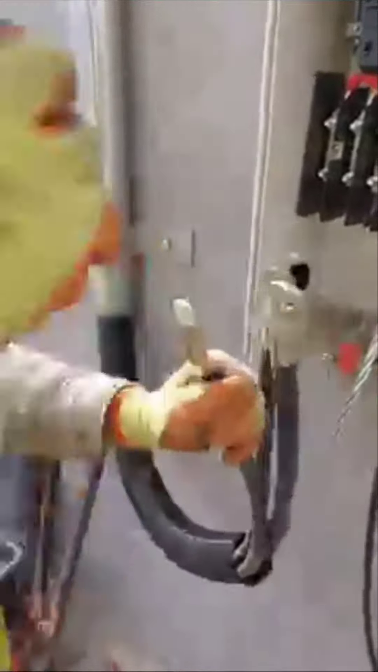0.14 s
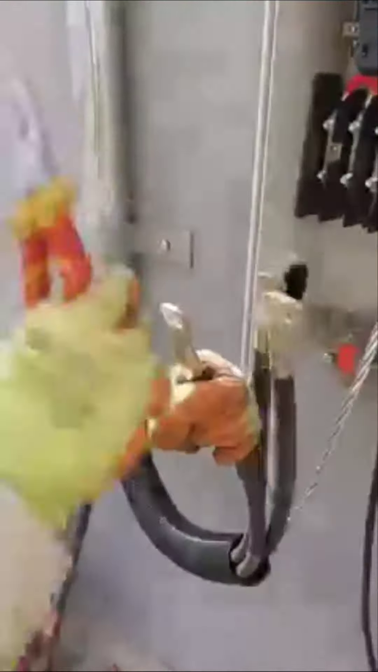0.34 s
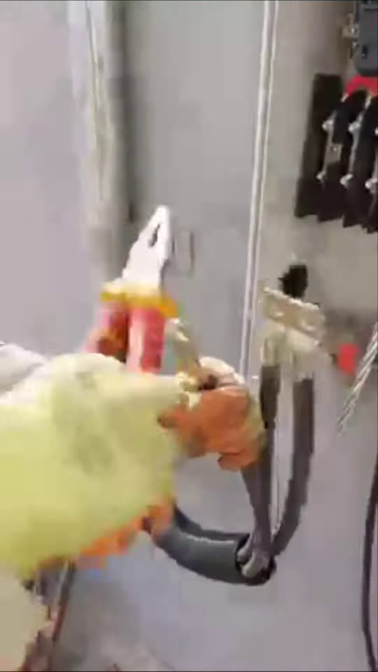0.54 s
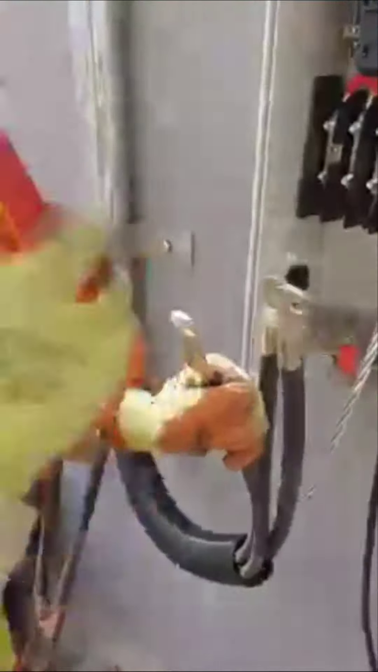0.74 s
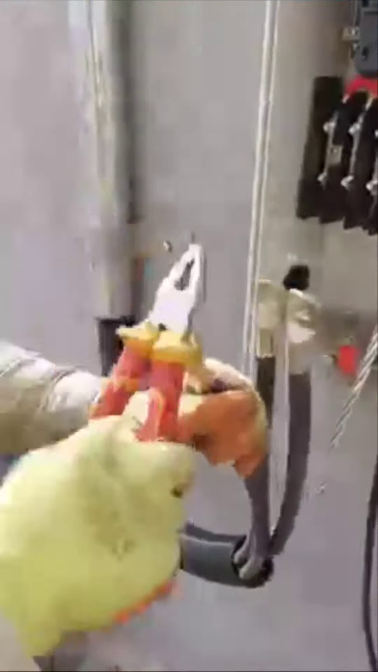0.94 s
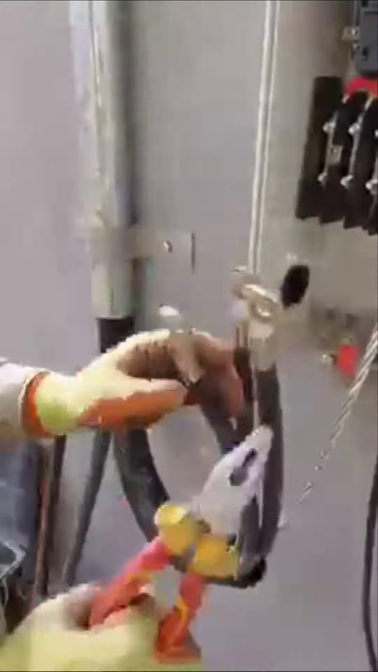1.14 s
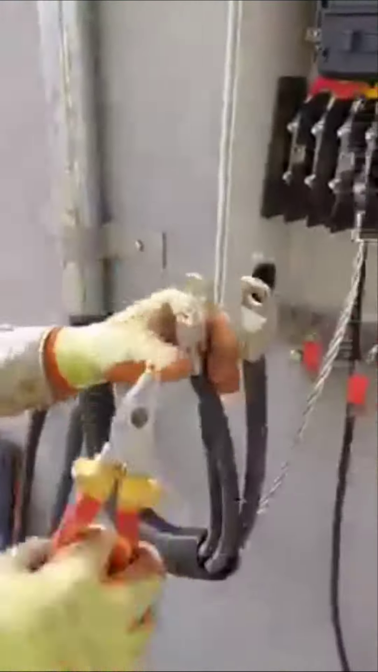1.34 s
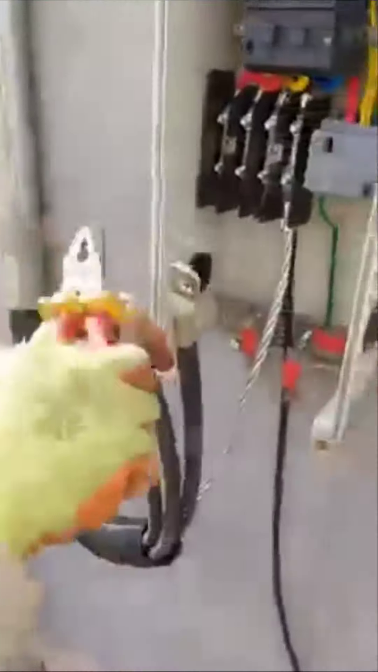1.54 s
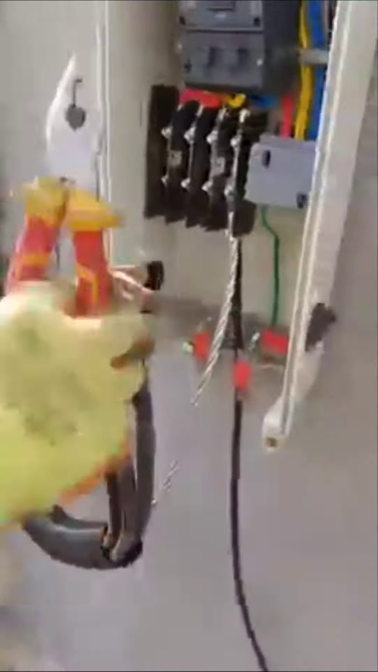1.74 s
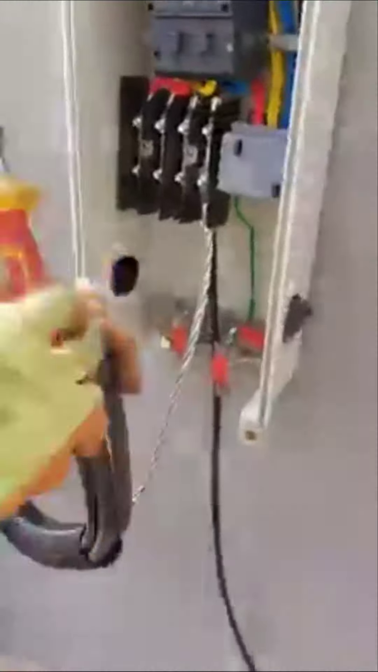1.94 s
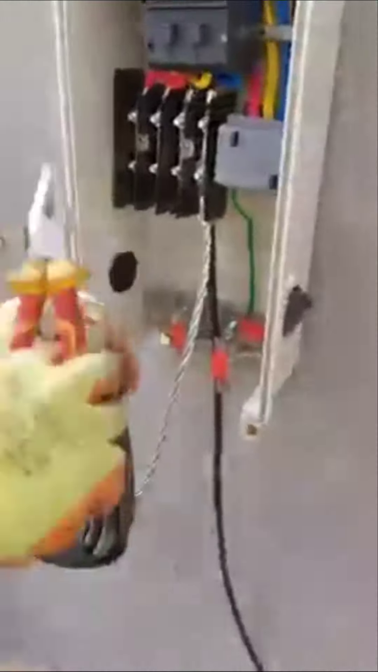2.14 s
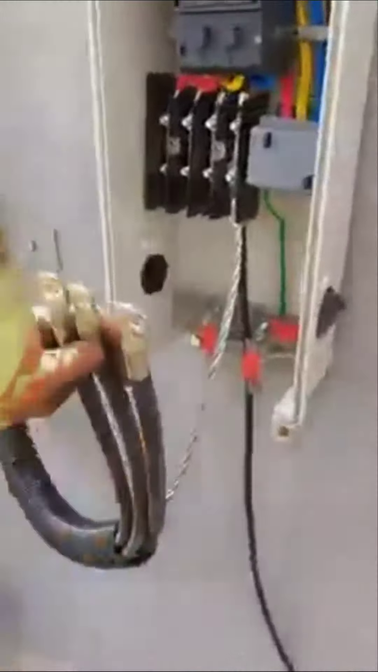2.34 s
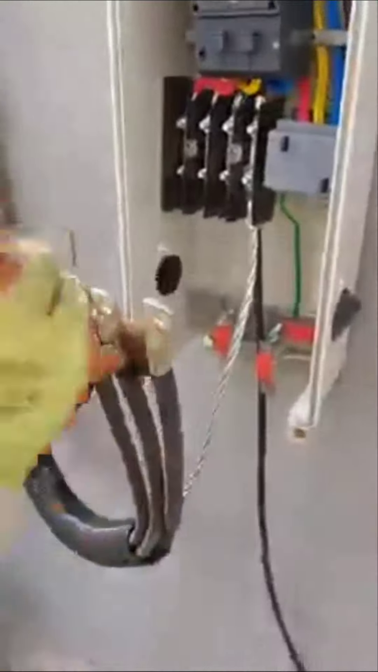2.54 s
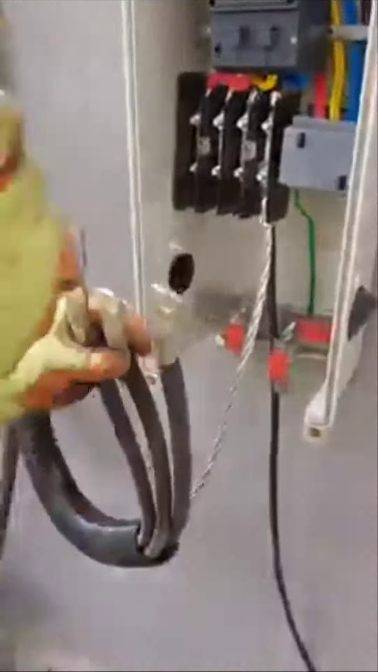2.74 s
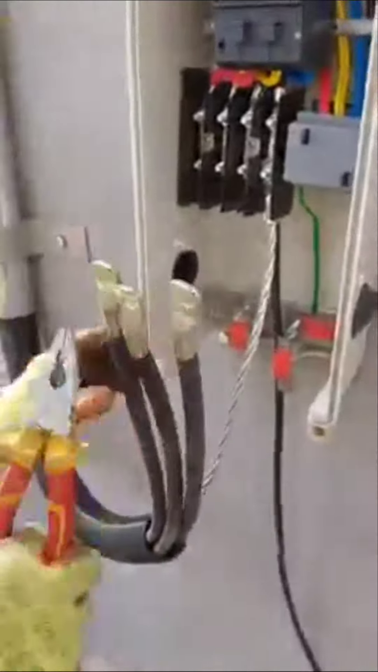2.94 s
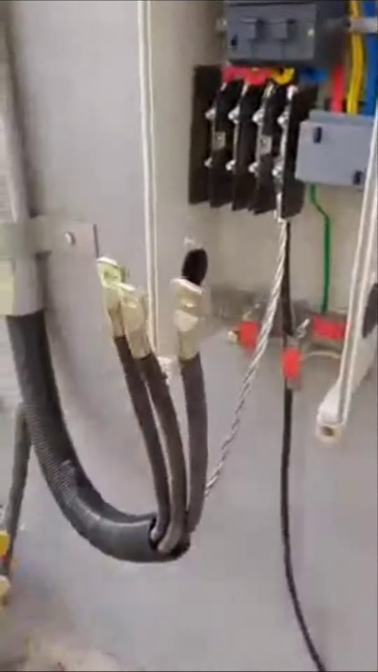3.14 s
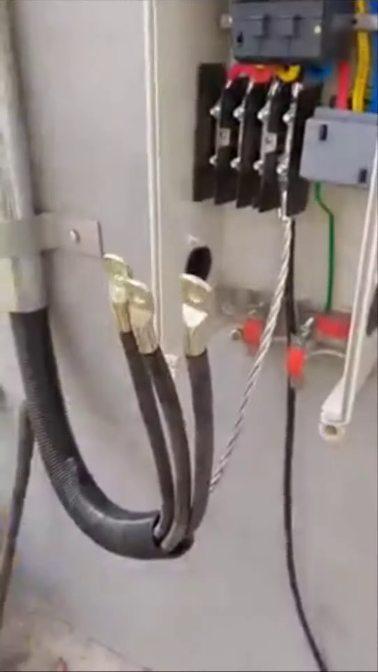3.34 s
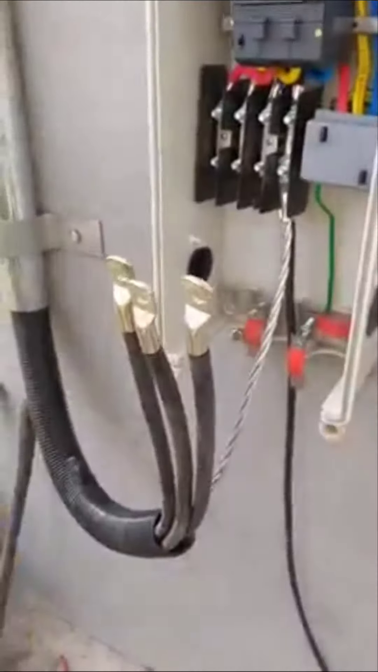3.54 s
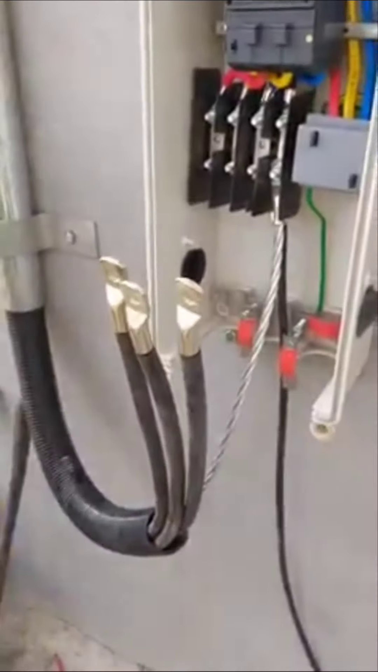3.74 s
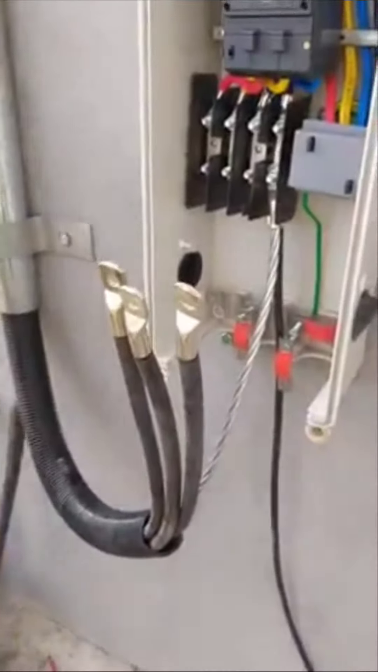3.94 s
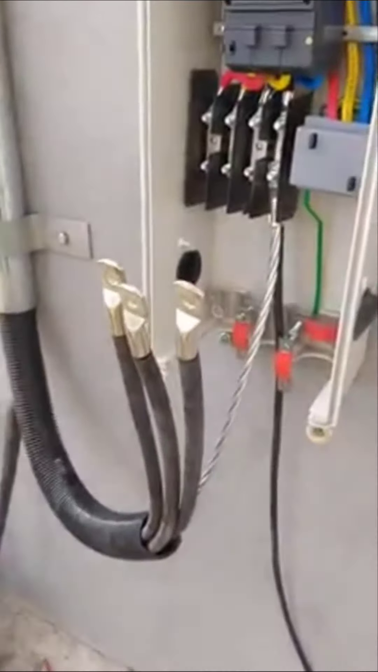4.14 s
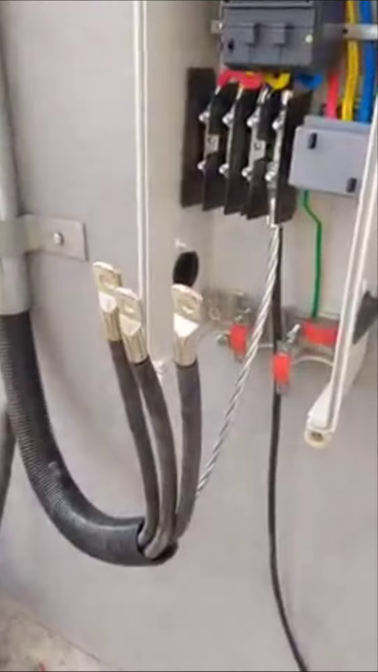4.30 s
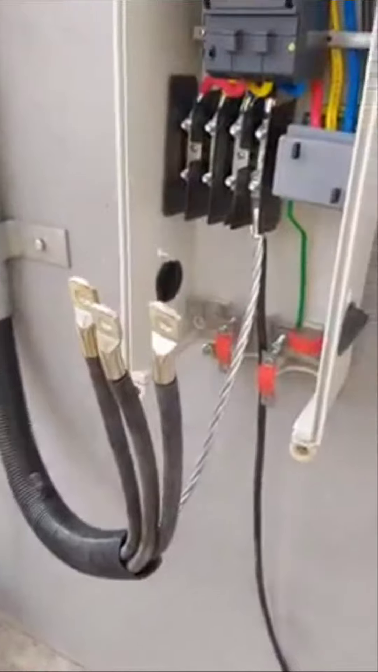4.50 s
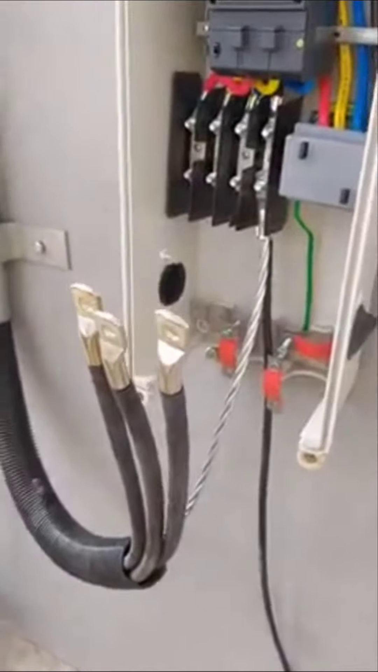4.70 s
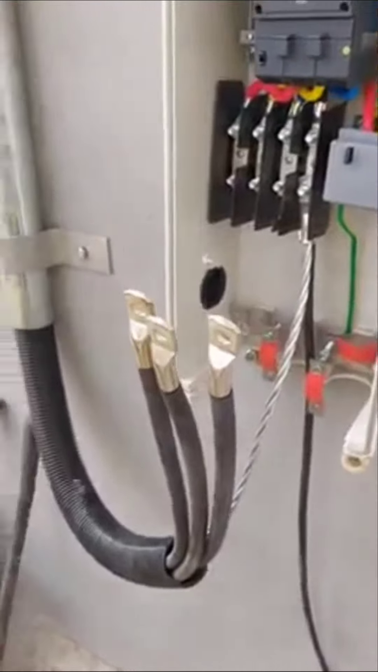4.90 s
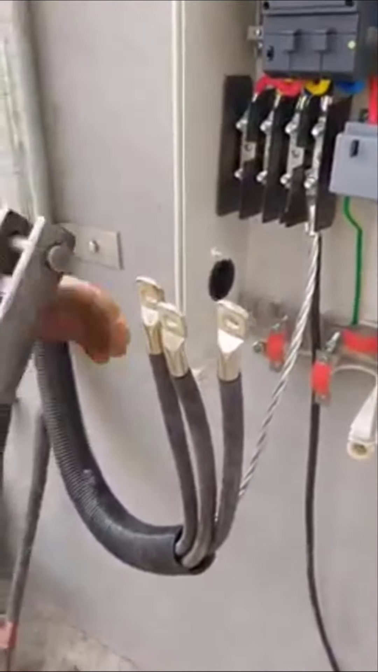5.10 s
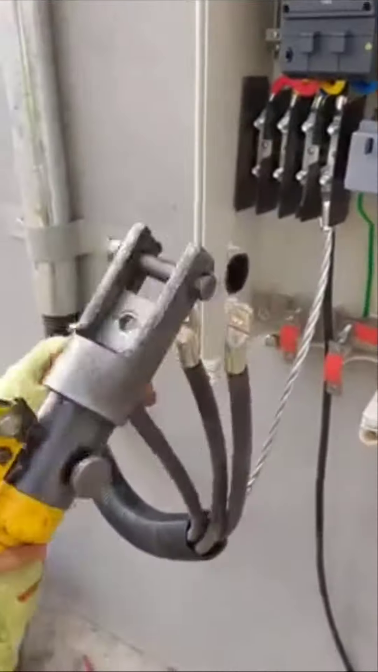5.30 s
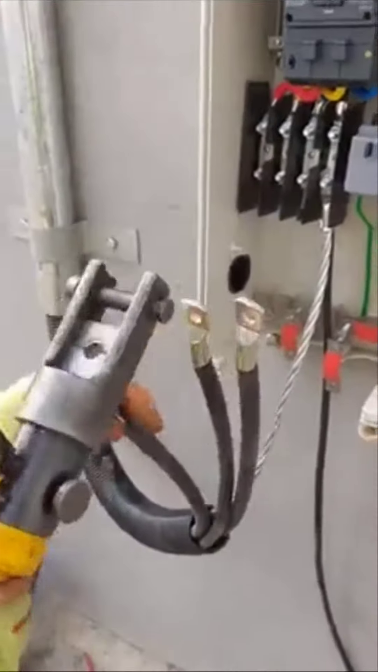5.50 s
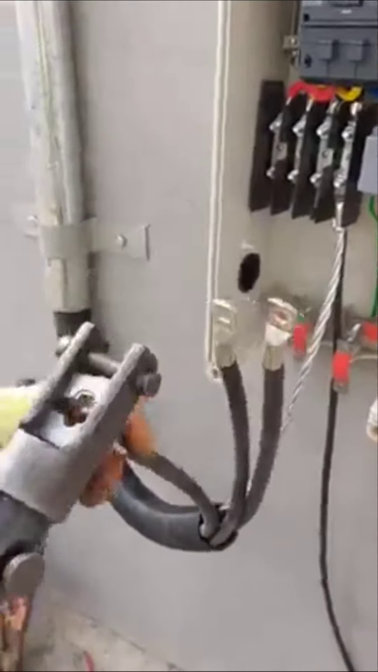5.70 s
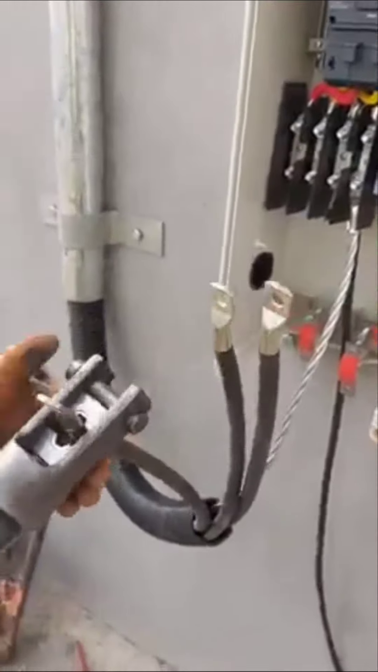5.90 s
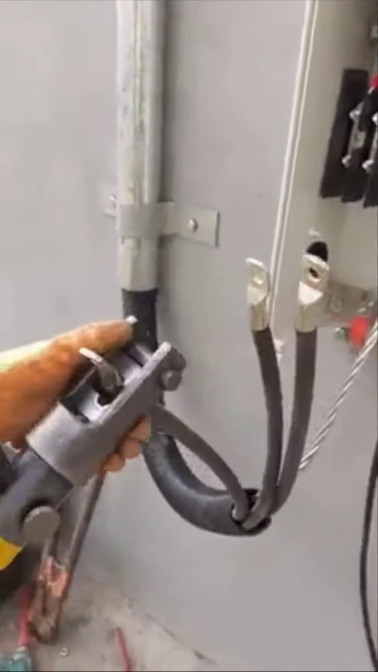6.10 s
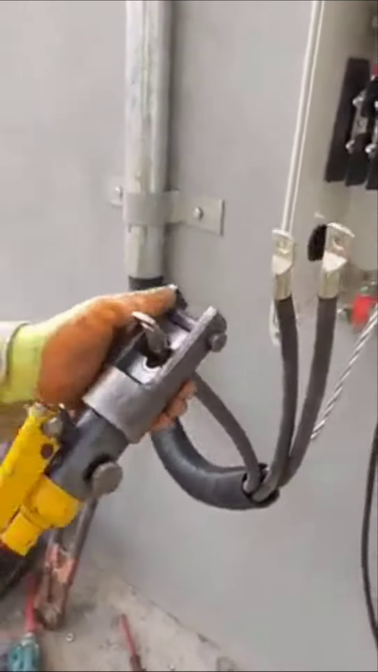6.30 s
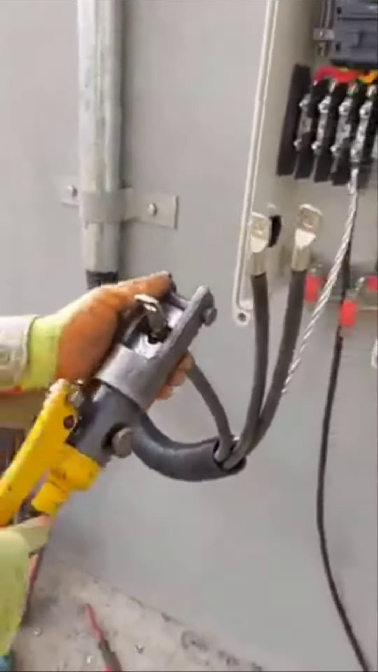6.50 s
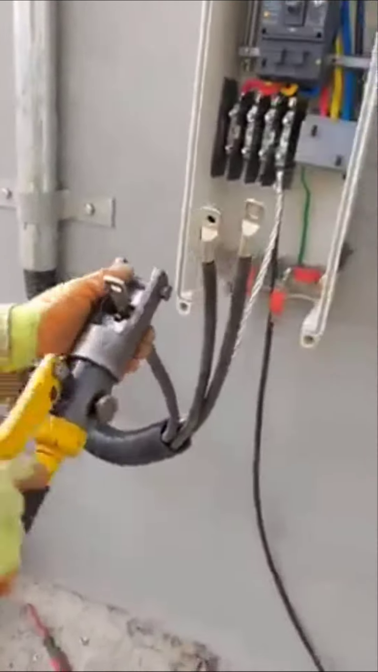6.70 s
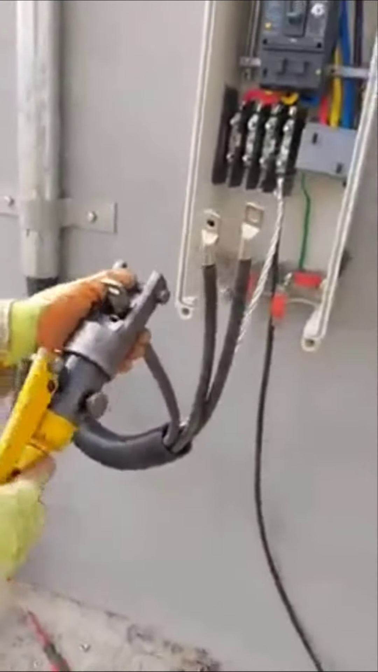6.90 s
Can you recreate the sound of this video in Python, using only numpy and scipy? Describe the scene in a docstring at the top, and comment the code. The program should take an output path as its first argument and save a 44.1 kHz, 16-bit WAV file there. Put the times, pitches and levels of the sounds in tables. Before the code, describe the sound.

Rapid metal clacks come about seven a second, pause briefly, then resume less regularly, ringing a thin steel panel. A quieter gap holds only low hum and faint rustle before a dull, hollow double clunk. Later come cable bumps, glove scuffs, lug clashes and short, damped steel clinks ending in a loud snap. Close microphone, stereo, with a short echo from a hard bare room.

```python
"""Steel pliers tap in quick runs on cable lugs in a sheet-steel cabinet: noise cracks, metal rings, thumps.
A heavy tool clunks down below, made of hollow tones that sag in pitch plus noisy clatter.
Gloves, sleeves and a stiff cable rustle and scrape as shaped noise; lugs knock together.
The head of a hand hydraulic crimper clinks and snaps onto a lug, as short rings with knocks and ticks.
All is close by in a bare electrical room, over its low drone of filtered noise."""
import sys
import numpy as np
from scipy import signal
from scipy.fft import rfft, irfft, next_fast_len
from scipy.io import wavfile

SR = 44100
rng = np.random.default_rng(int(sys.argv[2]) if len(sys.argv) > 2 else 0)


def materialize(psi):
    """Save the field psi as 16-bit PCM at rate SR to the path in sys.argv[1].

    A 1-D psi becomes a single channel; in a 2-D psi each row is a channel.
    """
    bounded = np.clip(np.atleast_2d(psi).T, -1, 1)
    quanta = np.round(bounded * 32767).astype(np.int16)
    wavfile.write(sys.argv[1], SR, quanta)


N = 306495
T = np.arange(N) / SR  # time in seconds
HIT_T = T[:SR // 2]  # time within one short sound
LEAD_S = .006  # the sound swells for this long before its peak


def undb(db):
    """Turn decibels into gain."""
    return 10 ** (np.asarray(db) / 20)


def add(track, s, sound, pan_db=0):
    """Mix a sound into a stereo track at time s; pan_db is left minus right."""
    i = max(int(s * SR), 0)
    sides = undb([[pan_db / 2], [-pan_db / 2]])
    track[:, i:i + sound.shape[-1]] += (sound * sides)[:, :N - i]


def noise(like, size=N, grain_db=0):
    """Stereo noise of rms 1; like = share common to both sides, grain_db makes it gritty."""
    like = np.clip(like, 0, 1)
    shared = np.sqrt(like) * rng.standard_normal(size)
    x = shared + np.sqrt(1 - like) * rng.standard_normal((2, size))
    grain = np.repeat(rng.standard_normal(size // 16 + 1), 16)[:size]  # a new level every 16 samples
    x = x * undb(grain_db * grain)
    return x / x.std()


def through(x, response):
    """Pass x through a response scaled to unit energy."""
    response = np.atleast_2d(response)
    energy = (response ** 2).sum(1).mean()
    return signal.fftconvolve(x, response / np.sqrt(energy), axes=1)[:, :x.shape[1]]


def colour(x, points, size=4096):
    """Filter to a (Hz, dB) shape without sounding early; white noise keeps its level."""
    hz, db = np.transpose(points)
    bins_hz = np.arange(size // 2 + 1) * SR / size
    shape = np.interp(np.log(bins_hz + 1), np.log(hz), db)
    # folding the cepstrum puts the response's energy as early as possible
    cepstrum = irfft(np.log(undb(shape)))
    cepstrum[1:size // 2] *= 2
    cepstrum[size // 2 + 1:] = 0
    return through(x, irfft(np.exp(rfft(cepstrum))))


def fade(t60):
    """Exponential decay that falls by 60 dB in t60 seconds."""
    return np.exp(-np.log(1000) * HIT_T / max(t60, 1e-3))


def ring(x, modes, t60, detune=0., scatter_db=0):
    """Decaying (Hz, dB) tones excited by x; high ones reach the two sides out of step."""
    t = HIT_T[:int(t60 * SR)]
    decay = fade(t60)[:len(t)]
    response = 0
    for (hz, db), (shift, size, *skew) in zip(modes, rng.standard_normal((len(modes), 4))):
        side_phase = np.array(skew)[:, None] * min(hz / 1500, 2)
        phase = 2 * np.pi * hz * (1 + detune * shift) * t + side_phase
        response = response + undb(db + scatter_db * size) * decay * np.sin(phase)
    return through(x, response)


def contact(t60, like, crack=0., grain_db=3, swell_s=0.0014):
    """Noise swells briefly to a crack, then chatters and dies away."""
    t = HIT_T[:SR // 4] - LEAD_S
    envelope = np.exp(np.minimum(t / swell_s, -np.log(1000) * t / max(t60, 1e-3)))
    x = noise(like, len(t), grain_db) * envelope
    x[:, int(LEAD_S * SR)] += crack
    return x


def bounced(x, delay_s, db):
    """A contact followed by its weaker repeat."""
    return x + undb(db) * np.roll(x, int(delay_s * SR), axis=1)


def waver(rate, depth_db):
    """A gain that wanders at random, picking a new target rate times a second."""
    targets = rng.standard_normal(4096)
    return undb(depth_db * np.interp(T * rate, np.arange(4096), targets))


def gestures(rows, attack_s, release_s):
    """Gain over time of (start s, length s, dB) movements: each swells, holds and dies away."""
    total = 0
    for s, length, db in rows:
        swell = np.clip((T - s) / attack_s, 0, 1)
        dying = np.exp(-np.maximum(T - s - length, 0) / release_s)
        total = total + undb(db) * swell * dying
    return total


# Tone of the room's background drone. Each row: frequency in Hz, level in dB before the overall level.
AIR = [(18, -88), (30, -37.5), (86, -7), (103, 2.5), (124, 5), (266, -18.5), (760, -27.5), (844, -27),
       (1350, -31.5), (1720, -34.5), (3060, -38), (3670, -37.5), (6050, -40.5), (13000, -41.5),
       (16000, -52)]
AIR_DB = -52.5


def room_drone():
    """The room's background drone: filtered noise, strongest in the lows, that wavers slowly."""
    return colour(noise(0.73), AIR) * waver(2.5, 1.0) * undb(AIR_DB)


# Tone of the echo tail. Each row: frequency in Hz, relative level in dB.
ROOM_COLOUR = [(50, -14.5), (150, -0.5), (400, 7.5), (900, 3), (2000, -1), (5000, -4), (9000, -5.5),
               (15000, -44)]


def room(x, wet_db, t60=0.28):
    """Add the room's echoes: a diffuse noise tail that builds up, then fades."""
    tail = through(x, noise(0.94, len(HIT_T)) * fade(t60) * (1 - fade(0.023)))
    return x + undb(wet_db) * colour(tail, ROOM_COLOUR)


# Cuffs brushing past. Each row: start in seconds, length in seconds, level in dB.
CUFFS = [(4.39, 0.2, -53.5), (5.26, 0.047, -41), (5.8, 0.041, -44)]
# Airy tone of the cloth. Each row: frequency in Hz, relative level in dB.
CUFF_COLOUR = [(3000, -22), (7000, -1), (9500, 5), (13000, -5), (16000, -19)]


def cuffs():
    """Cloth brushes past: a thin, fluttering hiss."""
    brushing = gestures(CUFFS, attack_s=0.015, release_s=0.0077)
    return colour(noise(.25, grain_db=2) * waver(54, 2) * brushing, CUFF_COLOUR)


def glove_swish(s=1.385, length=.1, start_hz=10000, end_hz=5200, db=-54):
    """A knitted glove slides along the cable and slows, so its thin, ragged hiss falls in pitch."""
    out = np.zeros((2, N))
    u = np.linspace(0, 1, int(length * SR))  # progress from 0 to 1
    threads = colour(noise(.3, len(u), grain_db=8), [(700, 0), (1600, -10), (4000, -26), (8000, -50)])
    glide = np.sin(2 * np.pi * np.cumsum(start_hz + (end_hz - start_hz) * u) / SR)
    flutter = waver(72, 5.1)[:len(u)]
    # the low noise rides on the gliding tone, which lifts it to a falling hiss
    add(out, s, undb(db) * threads * glide * np.sin(np.pi * u) * flutter)
    return out


def scuff(x):
    """The contact patch keeps shifting, so every third of an octave swells and sinks by itself."""
    size = next_fast_len(N)
    spectrum = rfft(x, size)
    octave = np.log2(np.arange(size // 2 + 1) * SR / size + 1)
    out = 0
    for centre in np.arange(7, 14.2, 1 / 3):
        band = np.maximum(1 - 3 * np.abs(octave - centre), 0)
        out = out + irfft(spectrum * band, size)[:, :N] * waver(40, 3.5)
    return out


GRIT_PER_S, GRIT_DB, GRIT_SPREAD_DB = 27, 21, 4.5  # catches a second, their level and its spread


def grit():
    """Sliding metal catches at random: tiny ticks of uneven size."""
    size_db = GRIT_DB + GRIT_SPREAD_DB * np.clip(rng.standard_normal(N), -2, 2)
    catches = (rng.random(N) < GRIT_PER_S / SR) * undb(size_db)
    ticks = through(np.array([catches, catches]), contact(0.021, .3))
    return colour(ticks, HEAD_COLOUR)


# Strokes of glove and cable sliding.
# Each row: start in seconds, length in seconds, level in dB, hiss in dB relative to that level.
STROKES = [(1.787, 0.033, -69, 7), (2.242, 0.056, -67, 2), (2.606, 0.025, -55.5, 5), (3.21, .02, -71, 8),
           (3.301, 0.11, -63.5, -0.5), (3.908, 0.043, -55.5, -5), (4.13, 0.1, -69.5, -0.5),
           (4.368, 0.064, -46, -5), (4.456, 0.062, -74.5, 16), (4.641, 0.029, -54, 3.5),
           (4.856, 0.21, -56.5, -2), (5.09, 0.19, -54, 0), (5.239, 0.35, -41, -1),
           (5.421, 0.13, -41.5, -25), (5.69, 0.11, -39, -1), (5.847, 0.39, -51.5, 0.5),
           (6.16, 0.041, -50, 3.5), (6.282, 0.13, -53, 2), (6.401, 0.43, -59, 7)]
STROKE_ATTACK_S, STROKE_RELEASE_S = 0.042, 0.047
# The stiff cable flexing in the hands. Each row: start in seconds, length in seconds, level in dB.
FLEXES = [(.62, 0.37, -43), (1.49, .7, -56), (2.39, .5, -53), (4.33, 0.06, -45), (4.54, 0.035, -42),
          (4.65, 0.16, -50), (5.35, 0.24, -39), (5.61, 0.029, -32.5), (5.75, 0.19, -39),
          (5.955, 0.027, -31.5), (6.02, 0.022, -27.5), (6.24, 0.077, -35), (6.33, 0.242, -31),
          (6.58, 0.087, -32), (6.735, 0.016, -31.5)]
FLEX_ATTACK_S, FLEX_RELEASE_S = 0.0056, 0.023
# Tones of the scrape, the hiss and the low bumps. Each row: frequency in Hz, relative level in dB.
SCRAPE_COLOUR = [(150, -37), (250, -5), (468, -0.5), (597, -5.5), (735, -2.5), (1130, -6.5), (1240, -7),
                 (4000, -23.5), (5200, -71.5), (8800, -120)]
HISS_COLOUR = [(1180, -18.5), (2000, -7.5), (4610, -9.5), (5030, -12), (5930, -13), (10000, -14.5),
               (14800, -30), (16000, -52)]
RUMBLE_COLOUR = [(18, -29), (30, -33.5), (43, -25), (102, 2), (119, 5.5), (250, -5.5), (347, -18.5),
                 (424, -20), (500, -26.5), (650, -25.5), (1100, -120)]
REST_START_S, REST_END_S, REST_DB = 2.97, 3.65, -5  # the sleeves rustle less in this stretch


def handling():
    """Glove and cable slide in fits and starts; sleeves never quite rest; the flexing cable adds low bumps."""
    slip = waver(40, 2.4)
    resting = (T > REST_START_S) & (T < REST_END_S)
    sleeves = waver(13, 5) * undb(REST_DB * resting)
    drag_rows = [(s, length, db) for s, length, db, _ in STROKES]
    slide_rows = [(s, length, db + hiss_db) for s, length, db, hiss_db in STROKES]
    drag = gestures(drag_rows, STROKE_ATTACK_S, STROKE_RELEASE_S)
    slide = gestures(slide_rows, STROKE_ATTACK_S, STROKE_RELEASE_S)
    scrape = colour(noise(0.71, grain_db=3.5) * (drag + undb(-83) * sleeves), SCRAPE_COLOUR)
    hiss = colour(noise(0.18, grain_db=2) * (slide + undb(-68) * sleeves), HISS_COLOUR)
    flexing = gestures(FLEXES, FLEX_ATTACK_S, FLEX_RELEASE_S)
    bumps = colour(noise(0.22) * waver(70, 3) * flexing, RUMBLE_COLOUR)
    return scuff(slip * (scrape + undb(-1.5) * hiss)) + slide * grit() + bumps


# Hollow ring of a nudged lug. Each row: frequency in Hz, relative level in dB.
LUG = [(400, -4.5), (685, -3), (800, -17), (1160, -18)]
LUG_T60_S = .14


def nudge(s=1.296, db=-40):
    """The gloved hand bumps a lug, which answers with a soft hollow note."""
    push = np.zeros((2, N))
    add(push, s, undb(db) * contact(0.095, 0.76, crack=8.4, swell_s=0.0024))
    note = undb(6) * ring(push, LUG, LUG_T60_S)
    dull = undb(-1.0) * colour(push, KNOCK_COLOUR)
    bright = undb(-9.5) * colour(push, TAP_COLOUR)
    return note + dull + bright


# Blows of the heavy tool settling.
# Each row: start in seconds, thud level in dB, base pitch in Hz, clatter level in dB before its boost.
CLUNKS = [(3.65, -4, 433, -23), (3.66, -5, 401, -18.5), (3.664, 3, 398.5, -29), (3.677, -24, 418, -36),
          (3.695, -17.5, 377, -24.5), (3.717, -23, 405, -25.5), (3.737, -40, 446, -33),
          (3.806, -14, 371, -40)]
# Hollow body of the heavy tool. Each row: multiple of the thud's pitch, level in dB.
HOLLOW = [(0.662, -6), (1, 4.5), (1.7, -15.5), (2.3, -14.5)]
# Tone of the clatter. Each row: frequency in Hz, relative level in dB.
CLUNK_COLOUR = [(71, -43.5), (120, -16), (188, -12.5), (222, -19), (418, 2), (605, -15), (930, -9.5),
                (1370, -19.5), (3520, -20.5), (5190, -26), (11500, -30), (14400, -44.5), (16000, -106)]


def heavy_tool():
    """A heavy tool lands, rocks and settles: hollow thuds that sag in pitch, with loose clatter."""
    thuds, clatter = np.zeros((2, 2, N))
    for s, db, hz, clatter_db in CLUNKS:
        sagging_hz = hz * (0.726 + 0.45 * fade(0.042))
        phase = 2 * np.pi * np.cumsum(sagging_hz) / SR
        body = sum(undb(mode_db) * np.sin(multiple * phase) for multiple, mode_db in HOLLOW)
        add(thuds, s, undb(db) * body * fade(0.033) * (1 - fade(0.021)))
        add(clatter, s + 0.0011 - LEAD_S, undb(clatter_db + 4.5) * contact(0.12, 0.49, grain_db=0.5))
    return thuds + colour(clatter, CLUNK_COLOUR)


# Lugs knocking against each other and the tools.
# Each row: start in seconds, strength in dB, hardness in dB (more tick, less dull knock).
CLASHES = [(2.745, -47, -7.5), (2.973, -56, -5), (3.796, -39.5, -8.5), (4.255, -48, 2), (4.299, -55.5, -4),
           (4.329, -47.5, -9.5), (4.56, -47, 9.5), (5.245, -36.5, -1), (5.488, -22, 1.5), (5.527, -47, -18),
           (5.558, -26.5, -7.5), (5.57, -30.5, 3), (5.739, -27, 4.5), (5.777, -41.5, -10), (5.843, -34, -3),
           (6.003, -40, -9.5), (6.189, -41, -6.5)]
# Tones of the dull knock and the bright tick. Each row: frequency in Hz, relative level in dB.
KNOCK_COLOUR = [(150, -26), (400, 0), (750, 12), (1400, -0.5), (2500, 1.5), (6000, -60)]
TICK_COLOUR = [(800, 7), (2000, -18.5), (6500, 10.5), (8500, 14.5), (12500, 9.5), (16000, -3)]
CLASH_T60_S, CLASH_KNOCK_DB, CLASH_TICK_DB = 0.066, -5.5, -6.5  # the decay is for a clash of -24 dB
CLASH_RING_DB_PER_DB = 0.1  # firmer clashes chatter longer


def lugs():
    """Lugs clash: a dull knock, a brief ring and a bright tick."""
    knock, metal, tick = np.zeros((3, 2, N))
    for s, db, hard_db in CLASHES:
        s += .001 - LEAD_S
        t60 = CLASH_T60_S * undb(CLASH_RING_DB_PER_DB * (db + 24))
        blow = undb(db) * contact(t60, 0.47, crack=2)
        add(knock, s, undb(db + CLASH_KNOCK_DB - hard_db) * contact(1.67 * t60, 0.58))
        rung = undb(-0.5) * ring(blow, HEAD, HEAD_T60_S, detune=0.045)
        add(metal, s, rung + undb(-4) * colour(blow, TAP_COLOUR))
        add(tick, s, undb(db + CLASH_TICK_DB + hard_db) * contact(t60, 0.25, crack=2.5))
    return undb(2.5) * colour(knock, KNOCK_COLOUR) + metal + undb(10) * colour(tick, TICK_COLOUR)


# The forged head clinks on the lug and at last snaps home.
# Each row: start in seconds, strength in dB, left minus right in dB.
CLINKS = [(5.623, -32.5, -4), (5.89, -29.5, -3), (6.126, -31.5, -5), (6.237, -28.5, -9), (6.295, -16, -1),
          (6.45, -21.5, -4.5), (6.526, -20, -3.5), (6.548, -18.5, 2), (6.609, -25.5, -0.5),
          (6.642, -30.5, 0), (6.725, -9.5, -3.5)]
# Ring of the forged head, also used for the lugs. Each row: frequency in Hz, relative level in dB.
HEAD = [(1550, -18), (2980, 1), (3250, 5), (3480, -3.5), (3720, 4), (4650, 0), (4880, 3.5), (5200, 6.5),
        (5900, 0.5)]
# Tone of the clink itself, also used for the grit. Each row: frequency in Hz, relative level in dB.
HEAD_COLOUR = [(400, -31.5), (1000, -13), (1550, -2.5), (2200, -4), (3300, 1.5), (5200, 7.5), (6500, -6),
               (12000, -19.5), (16000, -16)]
HEAD_T60_S, CLINK_T60_S, CLINK_KNOCK_DB, CLINK_TICK_DB = .016, 0.024, -28, -22.5
# lighter blows ring the high modes of the head, harder ones the low
EVEN_BLOW_DB, TILT_DB_PER_OCTAVE_PER_DB = -17, 2.1


def crimper_head():
    """The forged head clinks; the gripping glove damps the ring at once."""
    knock, head, tick = np.zeros((3, 2, N))
    for s, db, pan_db in CLINKS:
        s += .001 - LEAD_S
        tilt_db = TILT_DB_PER_OCTAVE_PER_DB * (EVEN_BLOW_DB - db)
        modes = [(hz, mode_db + tilt_db * np.log2(hz / HEAD[0][0])) for hz, mode_db in HEAD]
        blow = undb(db - 3) * contact(CLINK_T60_S, 0.56, crack=8.6, swell_s=0.0012)
        if db < EVEN_BLOW_DB - 2:  # a light touch skips once before it settles
            blow = undb(-2.5) * bounced(blow, .008, -10.5)
        add(knock, s, undb(db + CLINK_KNOCK_DB) * contact(5.1 * CLINK_T60_S, 0.49), pan_db)
        rung = undb(-2) * ring(blow, modes, HEAD_T60_S, detune=0.023, scatter_db=-3)
        add(head, s, rung + undb(-2.0) * colour(blow, HEAD_COLOUR), pan_db)
        add(tick, s, undb(db + CLINK_TICK_DB) * contact(CLINK_T60_S, 0.3, crack=3.5), pan_db)
    return undb(-2.5) * colour(knock, KNOCK_COLOUR) + head + undb(10) * colour(tick, TICK_COLOUR)


# Plier taps. Each row: start in seconds, strength in dB, thump in dB relative to that strength.
TAPS = [(0.036, 0, 1), (0.185, -.5, 5.5), (0.334, 0, -4.5), (0.488, .5, 6), (0.634, 2, -12), (0.775, .5, 5),
        (0.895, 0.5, 1), (1.016, -0.5, 0.5), (1.494, -0.5, -2.5), (1.625, 0, 2), (1.871, -1.5, 3),
        (2.009, -1.5, 9), (2.136, -.5, -6), (2.394, 0.5, 4), (2.565, 0.5, -7.5), (2.804, 1, -0.5)]
# Rings of pliers and lug, and of the cabinet panel. Each row: frequency in Hz, relative level in dB.
STEEL = [(2750, -32.5), (3550, 0.5), (3980, 1.5), (4600, 10.5), (4800, -6.5), (5000, -14.5), (5220, 7.5),
         (6060, -26), (7960, 1), (8250, -19), (8900, 5.5), (11200, -3)]
PANEL = [(120, -17), (178, 13), (265, -1.5), (335, 10), (425, 9.5), (520, 5.5), (640, -13), (725, 14),
         (840, -5.5), (1010, -12), (1200, 8.5)]
# Tones of the clack, the cabinet knock and the thump. Each row: frequency in Hz, relative level in dB.
TAP_COLOUR = [(180, -28.5), (300, -11.5), (398, -10), (787, -5), (1870, -8), (4230, -6.5), (4670, -1.5),
              (6100, -8), (8500, -2.5), (9390, -6), (11900, -4), (14000, -12), (16000, -26)]
CABINET_COLOUR = [(100, -36), (200, -1.5), (400, 2.5), (800, -1), (1300, -9.5), (2200, -21), (6000, -21.5)]
THUMP_COLOUR = [(25, -35), (50, -26.5), (90, -2), (125, -1.5), (200, -9), (400, -20), (1200, -44)]
STEEL_T60_S, PANEL_T60_S = .05, .1
TAP_STEEL_DB, TAP_PANEL_DB, TAP_THUMP_DB = -20.5, -30.5, -28
BOUNCE_S, BOUNCE_DB = .0045, -13  # the jaws chatter once on the lug; the delay varies around this
# while the hand holds the lugs, less of each tap reaches the panel
GRIP_START_S, GRIP_END_S, GRIP_DAMPING_DB = 1.3, 2.5, -3.5


def pliers(rebound_s=0.0932, rebound_spread_s=0.0045):
    """Each tap cracks, rings steel and panel and thumps; the jaws brush the lug again on the way back."""
    clack, knock, rings, thump = np.zeros((4, 2, N))
    t = HIT_T[:SR // 4]
    for (s, db, thump_db), (late, rebound, lean, hop) in zip(TAPS, rng.standard_normal((len(TAPS), 4))):
        gripped = GRIP_START_S < s < GRIP_END_S
        panel_db = TAP_PANEL_DB + db + GRIP_DAMPING_DB * gripped
        s += .0024 - LEAD_S
        brush_shape = np.exp(-((t - rebound_s - 0.0015 * late) / rebound_spread_s) ** 2)
        brush = undb(1.34 * rebound) * noise(0.34, len(t), 9.0) * brush_shape
        crack = contact(0.059, 0.053, crack=3.94, grain_db=4.0)
        strike = bounced(crack, BOUNCE_S * np.exp(0.33 * hop), BOUNCE_DB)
        rattle = contact(0.097, 0.12, grain_db=-7.5)  # play in the pivot
        touch = undb(TAP_STEEL_DB + db) * (strike + undb(-15.5) * rattle + undb(-28.5) * brush)
        panel_hit = contact(0.084, 0.72, crack=3.2) + undb(-5.0) * contact(0.2, 1.0)
        blow = undb(panel_db) * (panel_hit + undb(-18) * brush)
        add(clack, s, touch)
        add(knock, s, blow)
        # grip and point of contact change from tap to tap, and so do the rings
        steel = ring(touch, STEEL, STEEL_T60_S, detune=.012, scatter_db=2.5)
        panel = ring(blow, PANEL, PANEL_T60_S, detune=.025, scatter_db=2)
        add(rings, s, undb(-9.5) * steel + undb(-1.0) * panel)
        ports = np.array([[1.8], [0.25 + 0.24 * lean]])  # the thump reaches mainly the left port
        push = -contact(0.025, 0.047, crack=13.9, grain_db=0.5)
        add(thump, s - .002, ports * undb(TAP_THUMP_DB + db + thump_db) * push)
    clacks = undb(3) * colour(clack, TAP_COLOUR)
    knocks = undb(0.5) * colour(knock, CABINET_COLOUR)
    return clacks + knocks + rings + colour(thump, THUMP_COLOUR)


def scene():
    """Taps, clunk and crimper in the room, with handling sounds over its low drone."""
    tools = room(pliers() + nudge(), -18.5) + room(heavy_tool(), -34.5)
    close_clinks = room(lugs() + crimper_head(), -29)
    return tools + close_clinks + handling() + glove_swish() + cuffs() + room_drone()


TOP_HZ = 15600


def record(dry):
    """Limit peaks to 0.8, then low-pass at TOP_HZ."""
    limited = np.clip(dry, -.8, .8)
    return signal.sosfilt(signal.ellip(8, .2, 70, TOP_HZ, fs=SR, output="sos"), limited)


dry = scene()
out = record(dry)
materialize(out)
```